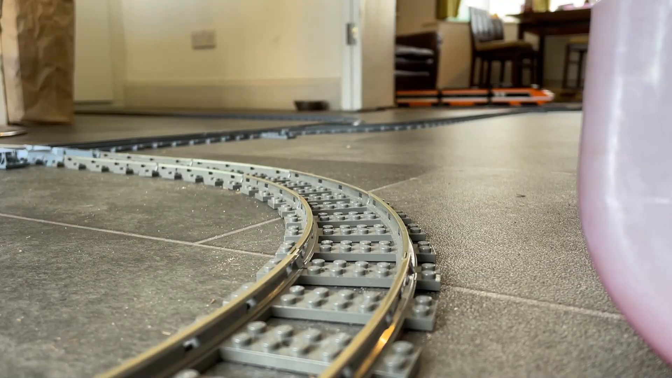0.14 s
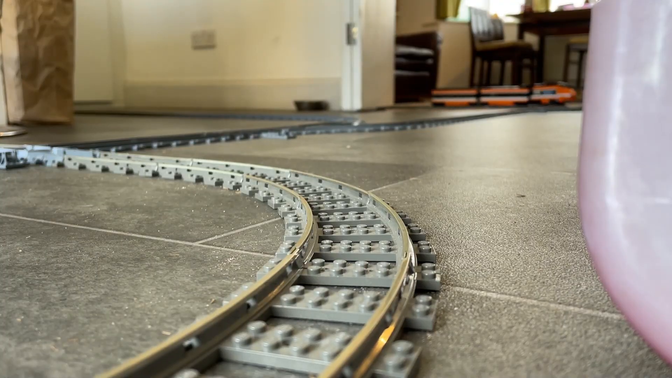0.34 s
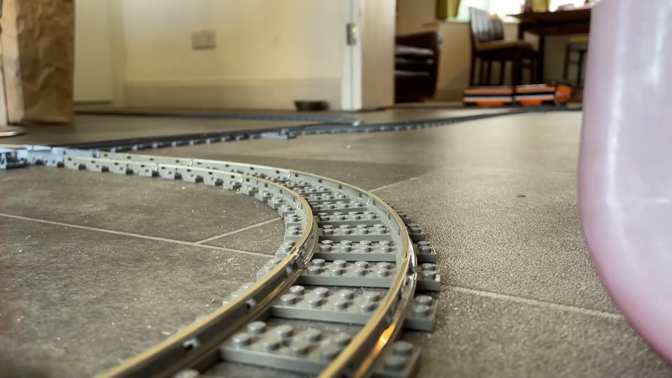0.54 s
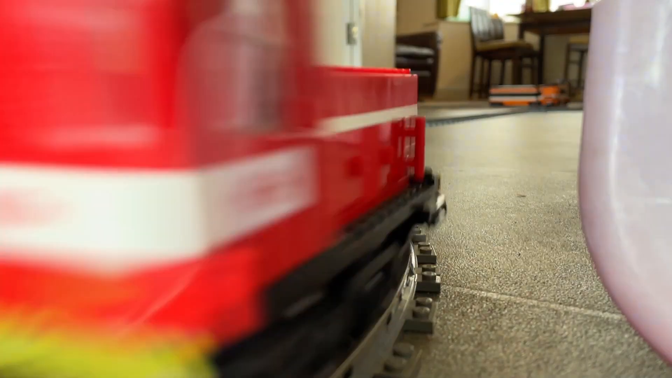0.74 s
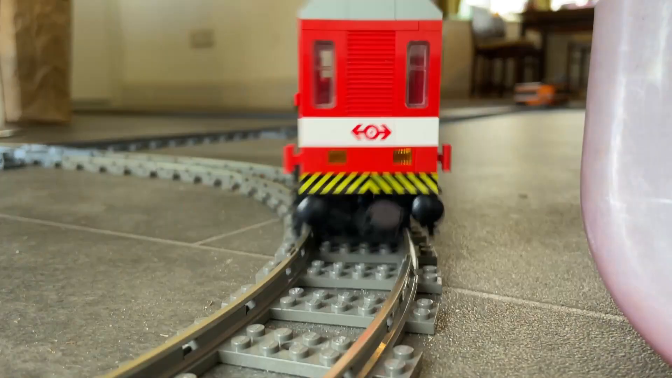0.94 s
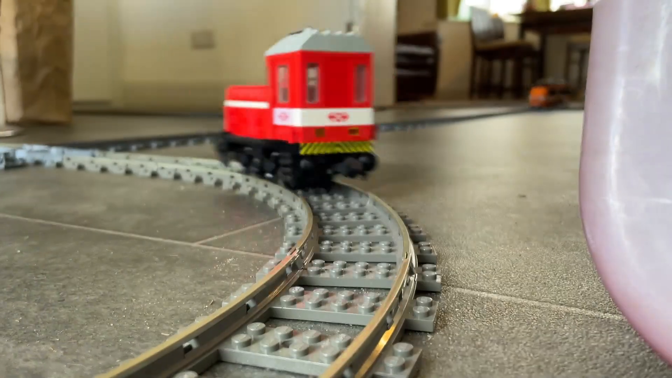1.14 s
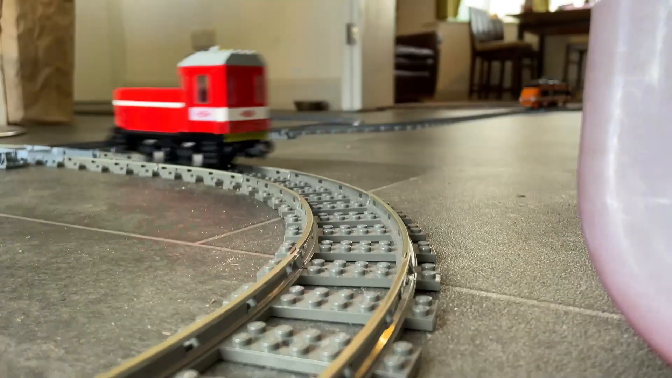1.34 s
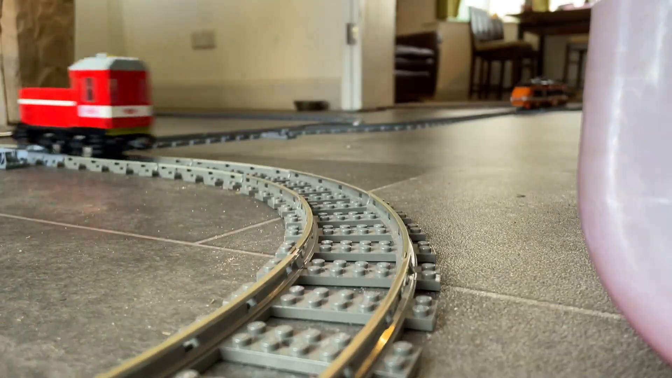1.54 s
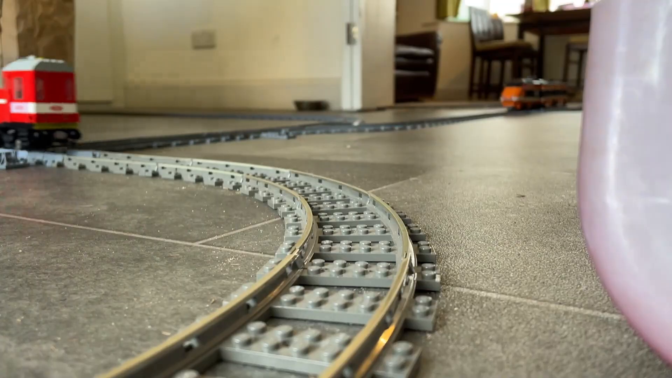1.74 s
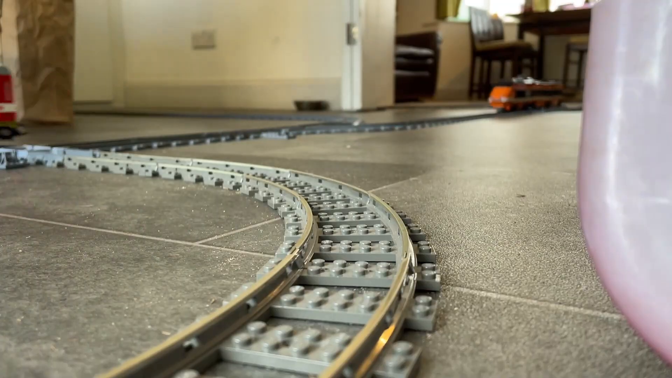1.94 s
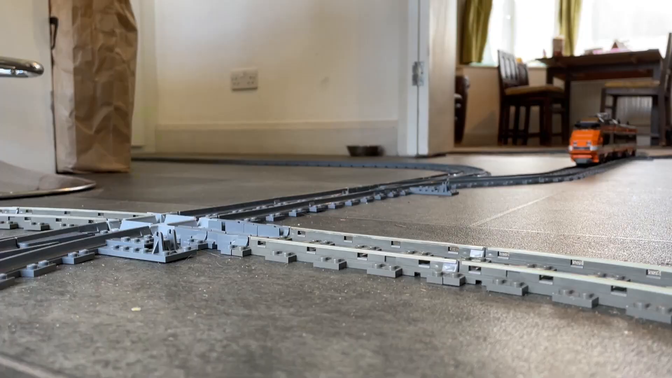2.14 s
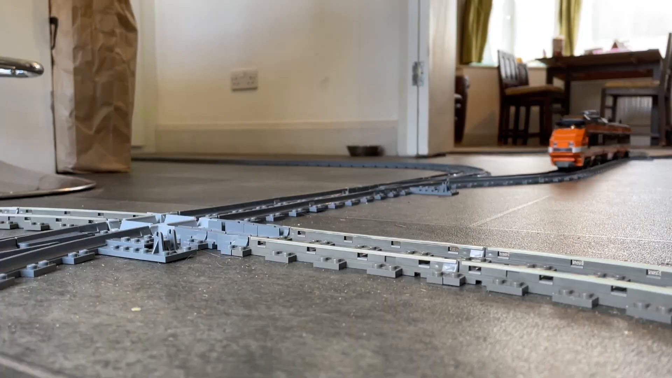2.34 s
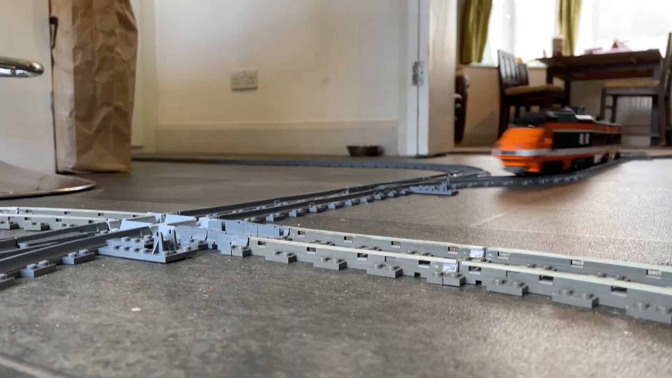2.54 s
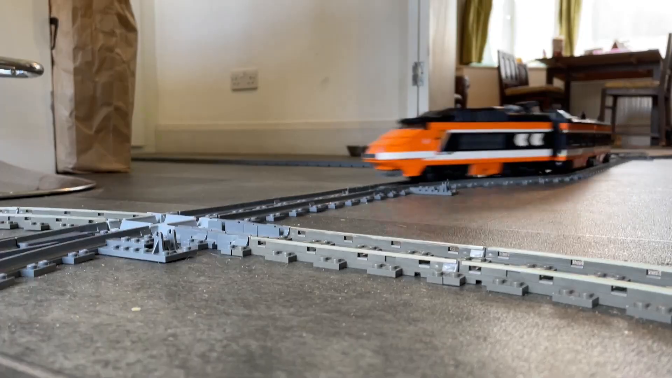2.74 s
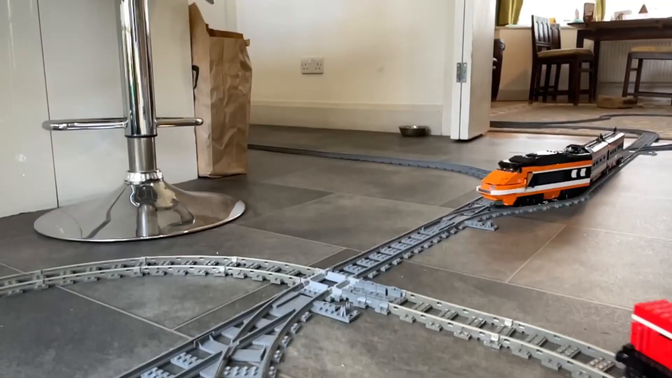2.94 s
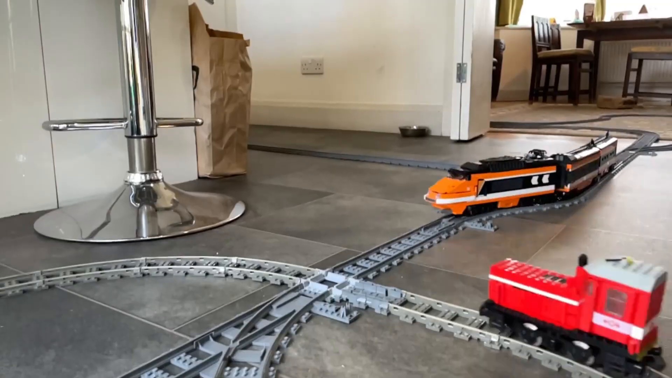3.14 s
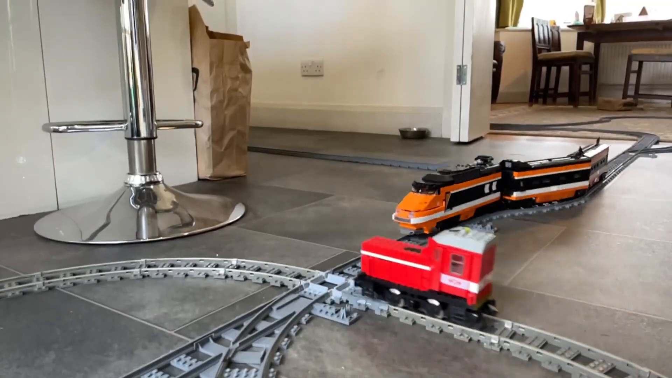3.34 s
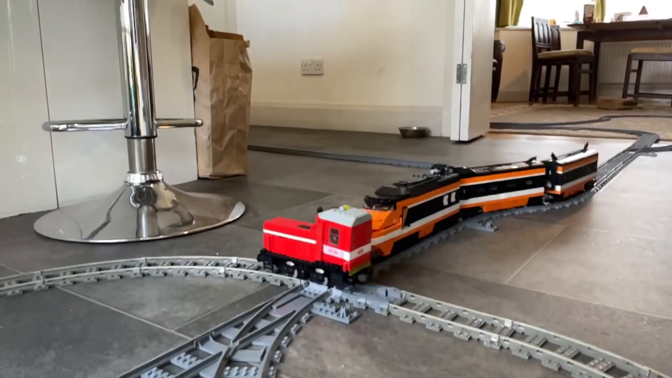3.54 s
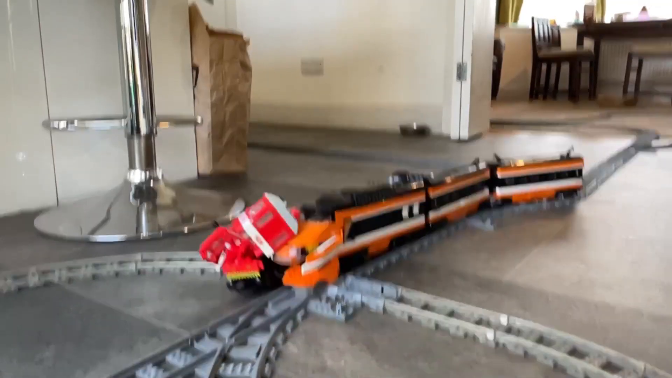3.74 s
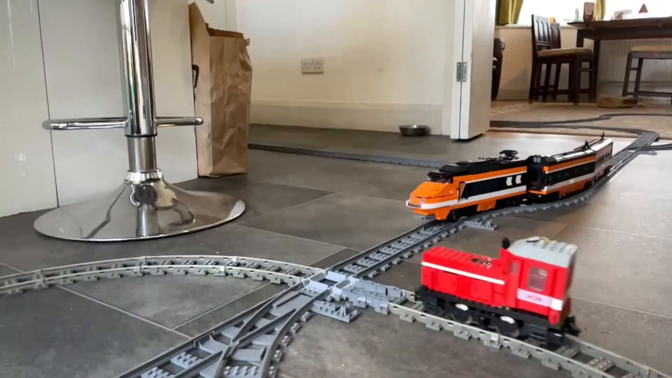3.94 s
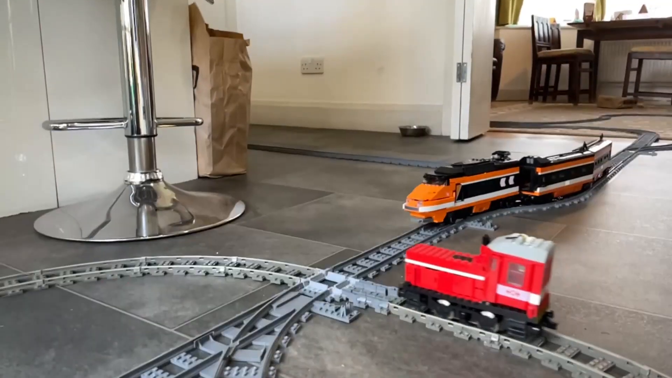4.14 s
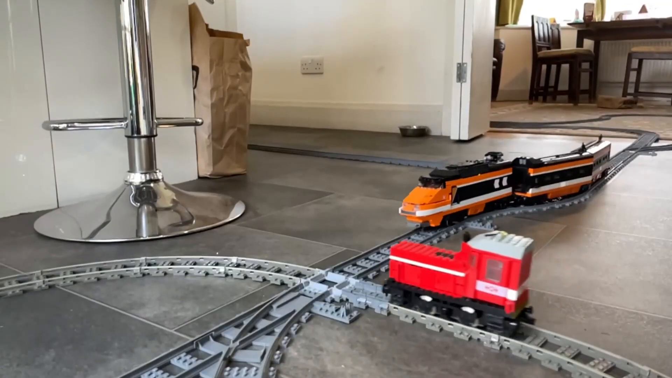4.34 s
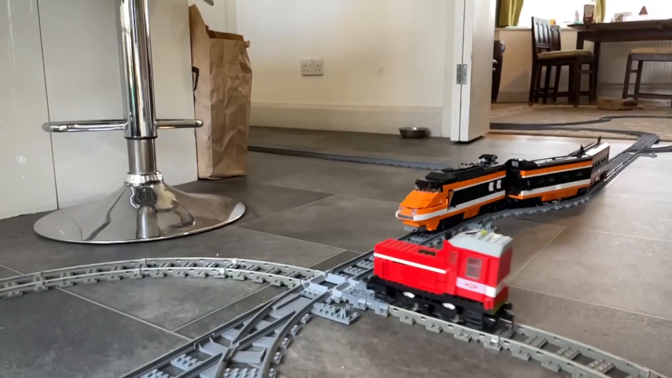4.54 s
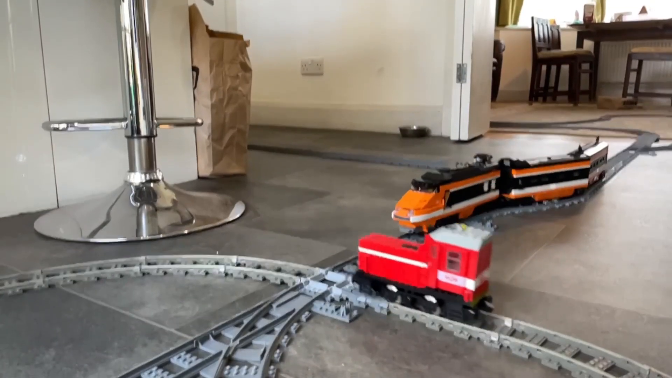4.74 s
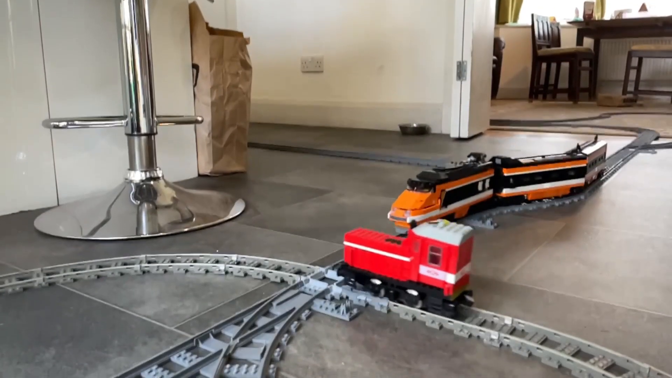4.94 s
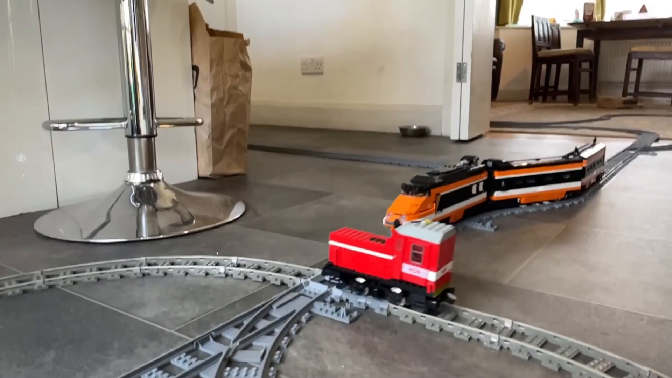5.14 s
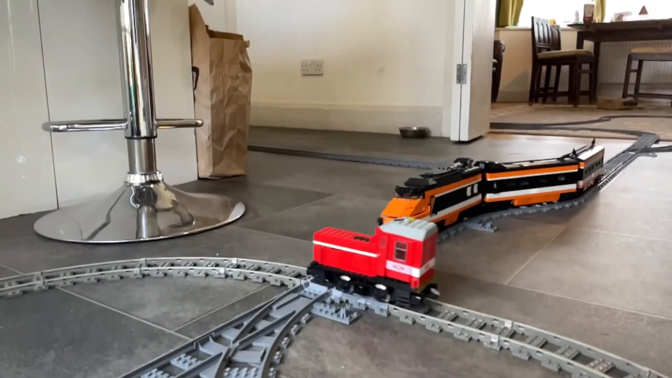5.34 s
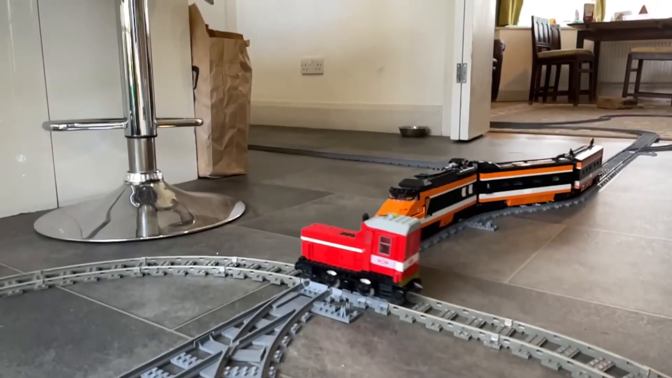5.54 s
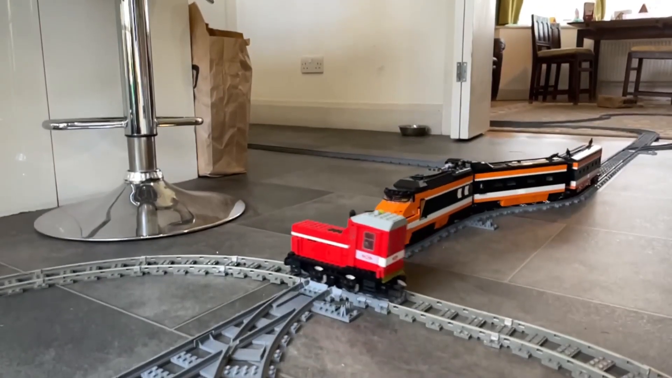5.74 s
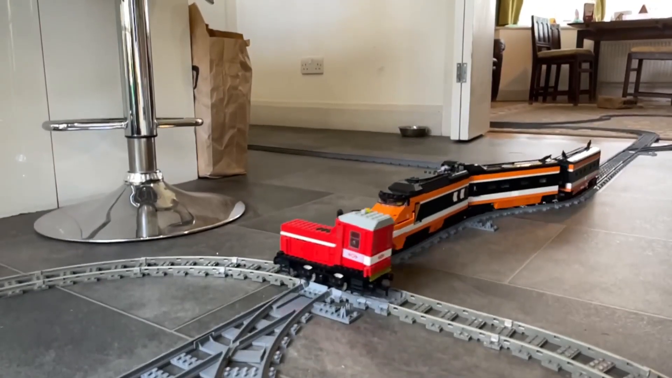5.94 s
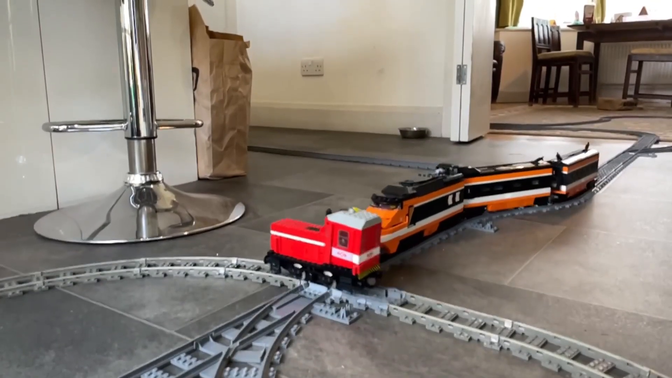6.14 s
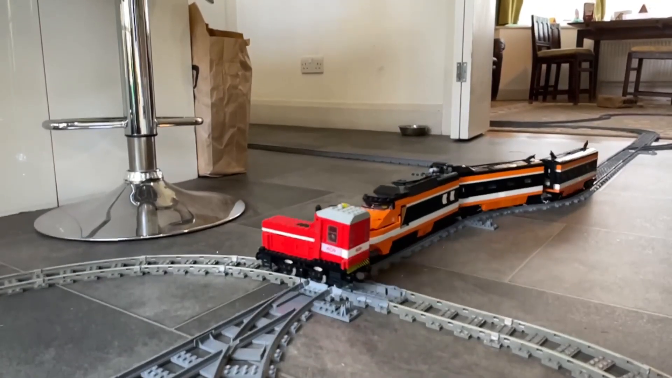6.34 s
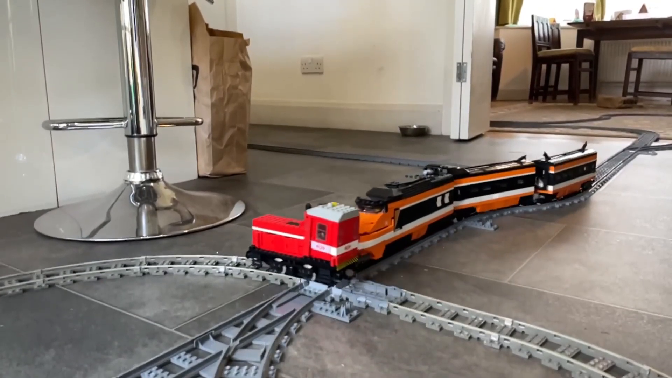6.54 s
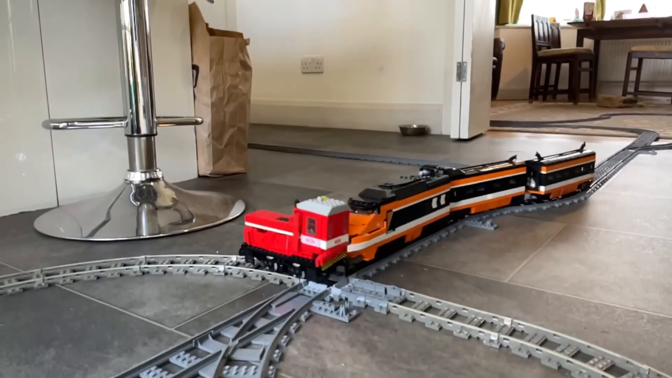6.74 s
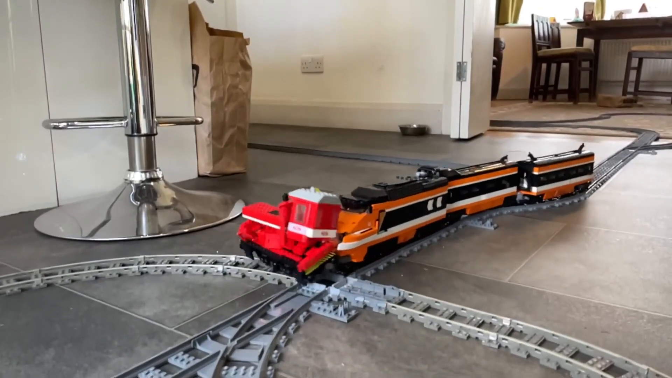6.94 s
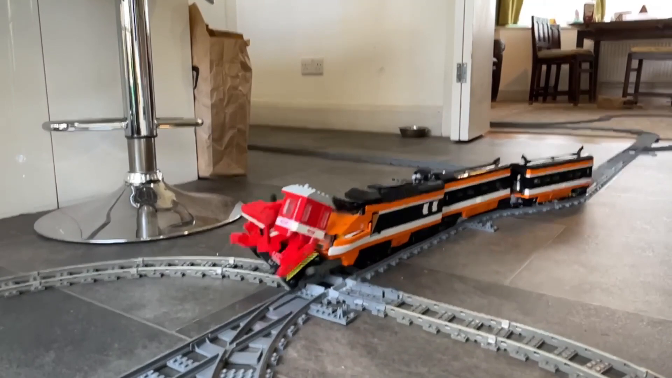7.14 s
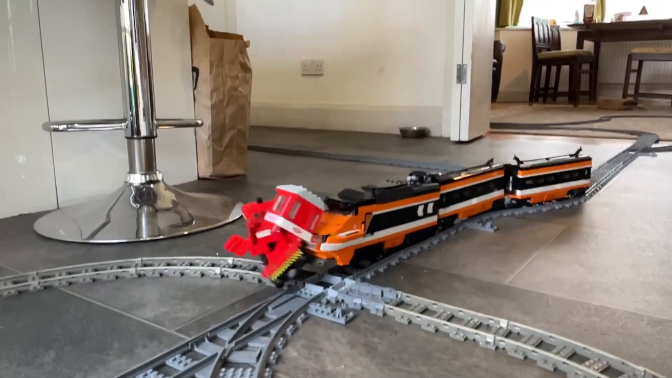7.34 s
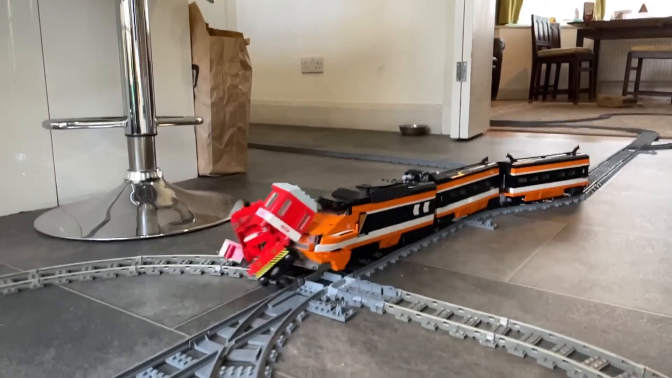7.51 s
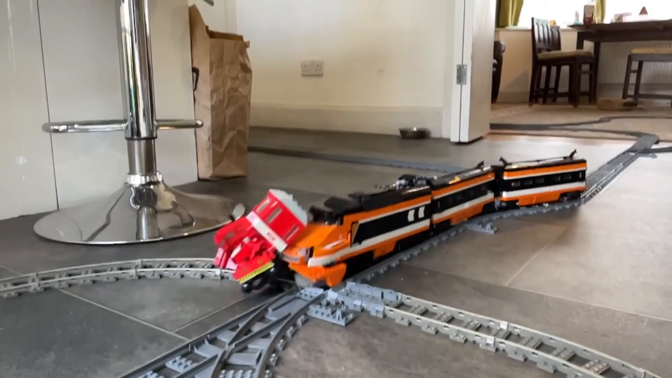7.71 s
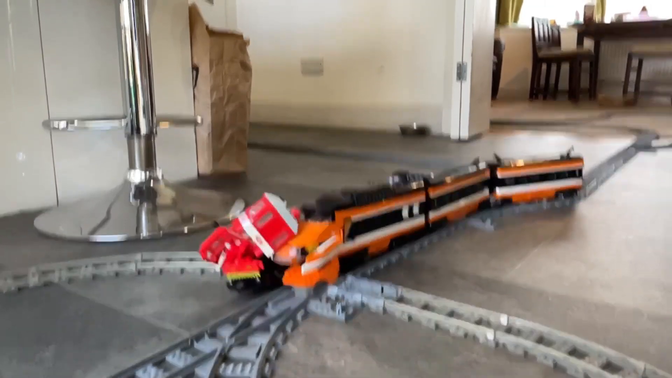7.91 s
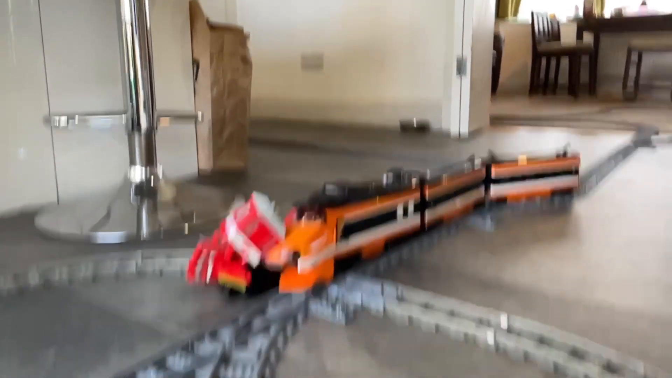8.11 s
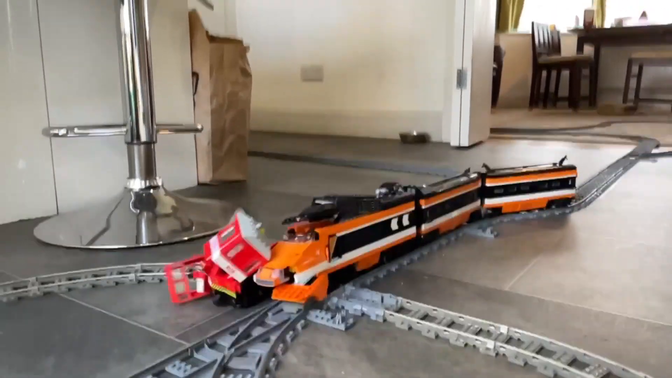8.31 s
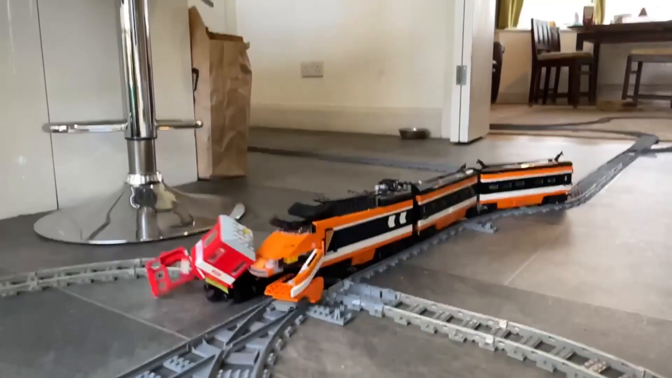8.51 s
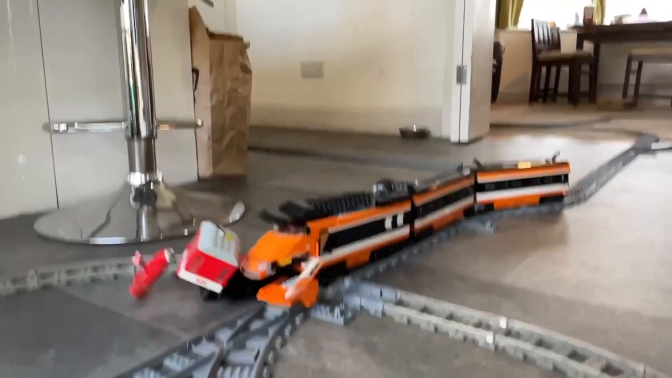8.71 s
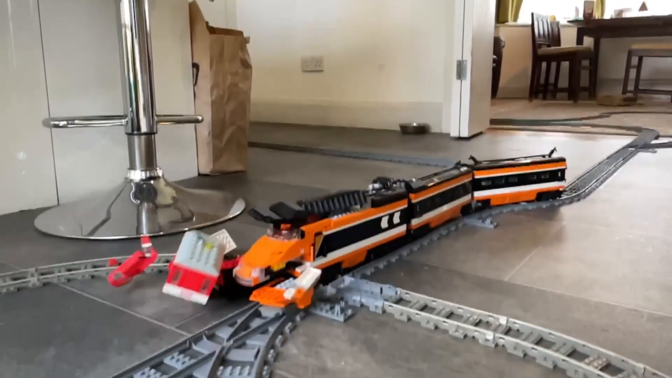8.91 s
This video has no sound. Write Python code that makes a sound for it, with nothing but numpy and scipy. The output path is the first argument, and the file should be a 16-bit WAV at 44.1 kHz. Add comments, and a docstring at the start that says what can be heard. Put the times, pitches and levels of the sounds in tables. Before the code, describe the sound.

Small motorised toy trains rattle along plastic track and collide with a brick clatter, then the crash repeats slowed down and dull.

```python
"""Motorised toy trains rattle along plastic track on a hard floor, heard from three places in turn.
Small random impacts shake their resonant bodies, gears whirr, and wheels knock on the rail joints.
At 3.6 s the trains collide and bricks clatter, each piece ringing at its own natural frequency.
From 4.4 s the event repeats in slow motion, dull, with the body modes three octaves down:
first a steady rolling, then at 6.6 s the impact and a long tumble of bricks."""
import sys
import numpy as np
from scipy import signal
from scipy.fft import rfft, irfft, next_fast_len
from scipy.io import wavfile
from scipy.ndimage import uniform_filter1d

SR = 44100
rng = np.random.default_rng(int(sys.argv[2]) if len(sys.argv) > 2 else 0)


def file_out(sig):
    """Save sig as 16-bit WAV at sys.argv[1]."""
    # one column per channel
    cols = np.atleast_2d(sig).T
    # limit, then scale
    lim = np.clip(cols, -1, 1)
    pcm = np.round(lim * 32767).astype(np.int16)
    wavfile.write(sys.argv[1], SR, pcm)


N = 399987

# Rattle envelopes for the three places, then the collision:
# (time [s], level [dB], bass control [dB], gear whirr control [dB], left minus right [dB])
FULL_SPEED_ENVELOPES = [
    [(0, -48, -2.5, -2.5, 0), (.2, -46.5, -10, -5, 0), (.44, -42, -7, -6.5, 1), (.53, -41, -9, 2.5, 3.5),
     (.56, -29, -12, -2.5, 4), (.65, -28.5, -19, -2.5, 4.5), (.74, -28, -9, 0, 2.5),
     (.79, -35.5, -14.5, 2, 6.5), (.9, -34.5, -14, -5, 6.5), (1.37, -43, -7.5, -5, 3.5),
     (1.78, -53, -7, 2.5, 2.5), (1.93, -42.5, -4, -1, 1), (2.16, -53, -6, 3, 2)],
    [(2.156, -38, -5, -9, 2.5), (2.174, -39, 4, 5, 1.0), (2.594, -31.5, -10, 1, -1.5),
     (2.69, -28, -6, -1, 1), (2.76, -27, -3.5, -4, 0.5), (2.858, -27.5, -1, -3.5, 2),
     (2.992, -29, -1.5, 2.5, 1), (3.118, -30.5, -5.5, 1.5, 3), (3.158, -31.5, 3, 5.5, 6)],
    [(3.158, -42, 0, -11.5, 2.5), (3.215, -43.5, -10.5, -11, 2.6), (3.425, -38.5, -13.5, -5, 2.9),
     (3.609, -37, -9.5, -11.5, 2.43)],
    [(3.61, -37.5, -15.5, 0, 5.1), (3.624, -30, -15, 3, 1.2), (3.714, -35.5, -12, 0.5, 2),
     (3.746, -28.5, -9.5, -3.5, 3.5), (3.78, -31, -6, -3, 3.3), (3.82, -27.5, -12, -1.5, 2.7),
     (3.87, -34.5, -7.5, 5, 2.45), (3.95, -31, -7, -5, 3.6), (4.06, -31, -5, -6, 2),
     (4.1, -29, -7.5, -12, 2.6), (4.17, -30, -8, -8.5, 2.9), (4.2, -33, -4.5, -10, 2.5),
     (4.368, -30, -11, -12, 3.4), (4.454, -45.5, -1, -7, 3.4), (4.47, -63, -19, -11, 5.0)],
]
# Rattle envelopes in slow motion, before and after the impact: (time [s], level [dB])
SLOW_ENVELOPES = [
    [(4.44, -46), (4.52, -53), (4.9, -51), (5.1, -49.5), (5.36, -49), (5.6, -48), (5.8, -52), (6.1, -48),
     (6.4, -49.5), (6.52, -52), (6.58, -52.5), (6.6, -45)],
    [(6.6, -38.5), (6.77, -37), (6.85, -43.5), (7.13, -46.5), (7.15, -41.5), (7.46, -49.5), (7.6, -45),
     (7.7, -43), (7.735, -35.5), (7.75, -29), (7.87, -36), (7.99, -38.5), (8.13, -33), (8.24, -33),
     (8.33, -32), (8.46, -39.5), (8.48, -35.5), (8.66, -44), (8.68, -38.5), (8.78, -46), (8.95, -39.5),
     (9.07, -46.5)],
]

# Spectra of the rattles and of a full-speed blow: (frequency [Hz], level [dB])
ENGINE_SPECTRUM = [(29, -30), (50, -29), (72, -1.5), (151, -1), (244, -5), (489, -6), (592, -12), (652, -8),
                   (1110, -8.5), (2330, -8.5), (8110, -15), (8920, -15.5), (15500, -34)]
LONG_TRAIN_SPECTRUM = [(29, -28), (50, -28), (72, -2), (119, -6), (367, -10), (565, -11), (1220, -11),
                       (2270, -11), (3670, -13), (7540, -12), (8920, -15.5), (10800, -23.5), (15500, -36.5)]
CRASH_SPECTRUM = [(29, -27), (50, -27), (72, 0.5), (174, -1.5), (413, -11.5), (753, -7.5), (1340, -8),
                  (2820, -6), (3260, -11.5), (3950, -5.5), (9360, -11), (10800, -17), (15500, -24)]
SLOW_SPECTRUM = [(30, -50.5), (70, -17.5), (130, -3.5), (200, -1), (500, -5), (800, -6), (1050, -7.5),
                 (1400, -14), (1850, -19), (2300, -18), (2400, -28)]
BLOW_SPECTRUM = [(300, -20.5), (1000, -4.5), (2500, -6.5), (6000, -6.5), (12000, -11), (16000, -22.5)]
# Resonances of brick bodies and motor housing: (frequency [Hz], bandwidth [Hz], lift [dB])
HOUSING_RESONANCES = [(130, 17, 5), (573, 61, 8), (1566, 180, 3.5), (2323, 250, 3), (4570, 360, 4),
                      (5370, 260, 3.5), (7580, 69.6, 10), (8970, 380, 7.5)]

# The range that each timbre control lifts: (frequency [Hz], weight [dB/dB])
BASS = [(260, 0.78), (400, 0.057)]
WHIRR = [(1600, 0.7), (2100, 0.72), (3000, 0.6), (3600, 0.25)]
HOLLOW = [(260, 0.43), (400, 0.77), (1100, 0.055), (1600, 0.067)]
FIZZ = [(5000, 0.31), (7500, 0.496)]
THUD = [(300, 0.68), (450, 0.097)]
TICK = [(900, 0.024), (1200, 0.28)]
# Change of timbre with rattle level, one row a stretch: (hollow body [dB/dB], fizz [dB/dB])
TIMBRE_SLOPES = [(-0.43, -0.4), (0.14, 0.99), (-.3, -1), (-0.29, 0.93)]
# The same in slow motion: (thud [dB/dB], tick [dB/dB])
SLOW_TIMBRE_SLOPES = [(-.3, 0.1), (-.3, -0.19)]

# Wheels meeting rail joints, and bricks striking:
# (time [s], level [dB], tilt [dB/octave], ring frequency [Hz], relative ring level [dB])
JOINT_BLOWS = [(0.157, -35, 3, 2830, -3), (0.311, -42, 6, 9000, -6), (0.327, -22, 4.5, 2660, 2),
               (0.3915, -25.5, 2, 3030, -1), (0.476, -29, 3.5, 2100, 0), (0.4954, -16.5, 1, 2600, 5.5),
               (0.541, -31, 2, 4740, -2), (0.558, -25, 4, 2380, 11), (0.634, -23, 4, 4300, 8),
               (0.659, -24, -3, 600, 6), (0.676, -17.5, 0, 604, 13), (0.707, -20, 0, 3500, 1),
               (0.722, -17, -4, 580, 9), (0.75, -18, -4, 610, 7), (0.895, -20.5, -5, 1400, -1),
               (0.936, -22, -9, 277, 10), (0.994, -25.5, -5, 3960, 4), (1.075, -30, -4, 2200, 2),
               (1.167, -36, 0, 2980, 8), (1.306, -25, -10, 2300, -5.5), (1.4184, -30.5, -2, 2620, 2),
               (1.593, -27, 0, 2520, 1), (1.6471, -22.5, -4.5, 1590, 8), (1.6555, -25.5, 0.5, 4630, -2),
               (1.6985, -33, -7, 2380, 7), (1.708, -34, -8, 4440, 2), (1.7424, -32, -1, 4470, -13),
               (1.8134, -26.5, 0, 2940, 0), (1.847, -22.5, -0.5, 2200, 3), (1.907, -24.5, -4, 2320, 11),
               (1.992, -28, -2.5, 2300, 1), (2.814, -13, 3, 4365, -6), (2.871, -21, -2.5, 2793, -0.5),
               (2.928, -12, -6, 563, -9), (2.94, -14, -8.5, 586, 2), (3.324, -27, 5, 2500, -6),
               (3.429, -27, -1.5, 1490, 12), (4.648, -55.5, -9, 686, 1), (4.891, -38.5, -2, 2050, -2),
               (5.13, -43, 1.5, 2270, -1.5), (5.219, -49, 5, 2140, -3), (5.35, -33.5, 2.5, 1374, -8),
               (5.545, -41, 10, 2210, 2), (5.658, -34.5, 2.5, 2233, -2), (5.889, -37.5, -2, 1500, -7),
               (6.089, -31, 6.5, 2320, -9), (6.494, -39, -4, 1413, -1)]
BRICK_BLOWS = [(3.611, -13, 2, 1947, -12), (3.624, -11.5, -4, 1770, -0.5), (3.68, -20, -1.5, 2140, 0),
               (3.75, -11.5, -1.5, 4304, -7.5), (3.803, -15.5, -3.5, 5990, 1.5),
               (3.813, -11, -1, 3870, 0.5), (3.8985, -21, -0.5, 5360, 4), (3.934, -15.5, -5, 840, 2.5),
               (3.951, -19.5, -8.5, 200, 9.5), (3.985, -13.5, -5, 900, -3), (4.021, -12.5, 1.5, 3997, 12),
               (4.022, -17, -5.5, 800, 2.5), (4.082, -22, -10.5, 210, 8.5), (4.093, -17, 5.5, 5620, 10),
               (4.108, -19, 3, 5270, 8), (4.134, -17, 1.5, 5280, 10), (4.154, -14, -7, 847, 4),
               (4.236, -21, 3, 5360, 0), (4.371, -17, 2, 5410, 4), (6.605, -15, 6, 1356, -4.5),
               (6.62, -25.5, 4, 258, 2), (6.659, -27, -1, 352, -2), (6.752, -22.5, -0.5, 334, 11.5),
               (6.782, -27, -1, 400, 3.5), (6.898, -33, 3, 2350, 4), (6.98, -34, -3, 1585, 0),
               (7.088, -41, 9, 1300, -3), (7.146, -29, 1.5, 338, -1), (7.19, -32.5, -6, 293, 4.5),
               (7.241, -35, 3, 453, 4), (7.312, -29, 6, 497, 3), (7.431, -34.5, 0, 2120, 4),
               (7.571, -25.5, 3.5, 748, -2.5), (7.59, -35.5, 5, 2160, -3), (7.745, -16.5, 3, 474, 5.5),
               (7.775, -22.5, -0.5, 688, 0.5), (7.803, -26, -4.5, 302, 5.5), (7.835, -20, 3, 2248, -8),
               (7.855, -26, 1.5, 341, 7), (7.931, -26.5, 1, 1360, -4), (8.029, -27, 7, 1309, -2),
               (8.054, -32, 4, 2200, 5.5), (8.075, -24.5, -3.5, 237, 4.5), (8.105, -22.5, 3, 1430, -4),
               (8.1426, -17, 6.5, 2254, 4), (8.147, -22.5, 1.5, 1336, 7), (8.1745, -16.5, 2.5, 746, 3.5),
               (8.194, -15.5, 3.5, 1535, 3.5), (8.22, -22.5, 1.5, 760, 2), (8.254, -20.5, -4.5, 484, 9),
               (8.2815, -23, -1.5, 1397, 2), (8.3496, -26.5, 1.5, 1520, 0), (8.4, -27, 4.5, 1430, 3),
               (8.48, -25, 6, 2295, 5), (8.509, -36, 5.5, 700, -2), (8.671, -25, -3.5, 235, 3),
               (8.851, -33, 2.5, 1360, -6), (8.969, -31.5, -5, 570, 12)]
# Train body modes, excited by every blow: (frequency at full speed [Hz], relative level [dB])
BODY_MODES = [(290, 5), (565, -4), (2400, -8), (2750, -5), (4500, -15.5), (5350, -9.5), (10400, -5.5),
              (18100, 3)]
# Brief swells of gear whirr, wheel rasp, scraping, a shaken hollow body or a floor thump:
# (time [s], duration [s], frequency [Hz], bandwidth [Hz], level [dB])
SWELL_EVENTS = [(0.26, 0.7, 2560, 960, -42), (.53, 0.14, 4600, 500, -38), (.54, 0.32, 575, 69, -38.5),
                (0.878, 0.06, 1100, 900, -37), (.92, 0.047, 298, 150, -40), (1.9, 0.26, 154, 80, -36),
                (2.177, 0.029, 2760, 1200, -37.5), (2.75, 0.36, 150, 80, -36), (3.72, 0.19, 176, 63, -35.5),
                (4.105, 0.078, 2850, 99.5, -33.5), (2.47, 0.061, 580, 98, -36.5),
                (2.7, 0.11, 590, 100, -38.5), (2.931, 0.058, 584, 90, -31), (2.7, 0.072, 586, 99.7, -38.5),
                (0.748, 0.61, 2210, 120, -50), (.75, 0.56, 2950, 210, -47), (0.796, 0.59, 5100, 150, -47.5),
                (.87, 0.49, 1570, 220, -46.5), (0.547, .3, 3600, 120, -48), (0.69, 0.097, 3140, 900, -34.5),
                (0.6, 0.12, 2420, 250, -37), (2.7, 0.24, 2300, 300, -40.5), (2.919, .04, 4200, 1500, -27.5),
                (3.988, 0.045, 720, 298, -27.5), (4.16, 0.044, 726, 290, -26),
                (6.599, 0.32, 227, 150, -41.5), (7.732, 0.16, 380, 440, -37), (8.4, 0.05, 400, 300, -43),
                (8.212, 0.06, 790, 200, -30.5), (8.222, 0.054, 489, 91, -32.5), (8.29, 0.06, 310, 240, -35),
                (8.05, 0.5, 110, 56, -43.5), (6.6, 0.36, 100, 48, -46.5)]

# Relation between the two channels:
# (frequency [Hz], coherence [0-1], phase lead of the right [rad], left minus right [dB])
RUNNING_STEREO = [(60, .85, 0, -3), (170, .85, -.2, -2), (780, .5, -.2, 1), (1380, .4, 2.2, 0.5),
                  (1980, .5, .7, .1), (2580, .65, -.3, .1), (3400, .55, -.4, 2), (5000, .6, -.4, 1.5),
                  (7200, .55, .4, -1), (10000, .2, -.5, -3), (14000, .4, .1, -3)]
CRASH_STEREO = [(60, .85, 0, -3), (220, .82, 0, 0), (450, .33, .1, -1.5), (900, .4, -1.3, 2),
                (1350, .33, -2.5, .5), (2200, .3, -.4, -1.5), (3400, .1, -2.5, .1), (5000, .3, -2, 1),
                (7200, .3, .4, 1.5), (10000, .2, -.4, -3), (14000, .4, .1, -3)]
SLOW_STEREO = [(50, .3, 0, 3), (400, .2, .1, 3), (850, .5, -.8, 6), (1100, .85, -.4, 1),
               (1400, .98, .01, .5), (1740, 1, 0, 0), (1790, 1, .43, 0), (1920, 1, -.47, 0),
               (1970, 1, 0, 0), (2400, .98, .01, .5)]


def gain_of(db):
    """Amplitude ratio: tenfold for every 20 dB."""
    return 10 ** (np.asarray(db) / 20)


def unit_rms(x):
    """Normalisation to unit mean power."""
    return x / np.sqrt(np.mean(x ** 2) + 1e-20)


def curve_at(points, hz):
    """Linear interpolation on a logarithmic frequency axis."""
    f, value = np.transpose(points)
    return np.interp(np.log(hz + 1), np.log(f + 1), value)


def add(mix, start_s, sound):
    """Superposition: a stereo sound adds to the mix from start_s on."""
    part = mix[:, round(start_s * SR):][:, :sound.shape[1]]
    part += sound[:, :part.shape[1]]


def jolts(size, per_s, spread_db, t60, depth):
    """Shot noise: small random impacts, a few of them large, decay and modulate white noise."""
    strengths = gain_of(spread_db * np.minimum(rng.exponential(1, size), 4))
    hits = strengths * (rng.random(size) < per_s / SR)
    shake = signal.lfilter([1], [1, -gain_of(-60 / (t60 * SR))], hits)
    return (1 + depth * shake / shake.mean()) * rng.standard_normal((2, size))


def rattle(times, level_db, spectrum, resonances, controls, band_hz, shaking, patchy_db, ringing_db):
    """Source and filter: jolts pass through the train's changing response, levelled within band_hz."""
    fade_s = 0.004
    drive = jolts(round((times[-1] - times[0] + fade_s) * SR), **shaking)
    hz, frame_s, frames = signal.stft(drive, SR, nperseg=1024, noverlap=768)
    lift_db = sum(db / (1 + (2 * (hz - f) / width) ** 2) for f, width, db in resonances)
    steady_db = (curve_at(spectrum, hz) + lift_db)[:, None]
    response_db = steady_db
    for weights, control_db in controls:
        change_db = np.interp(times[0] + frame_s, times, control_db - np.median(control_db))
        response_db = response_db + curve_at(weights, hz)[:, None] * change_db
    # Loose bricks come and go in broad patches; single parts ring on in narrow bands.
    wide, thin = rng.standard_normal(response_db.T.shape + (2,)).T
    for depth_db, noise, bins, span in (patchy_db, wide, 9, 8), (ringing_db, thin, 2, 14):
        across_bins = uniform_filter1d(noise, bins, axis=0)
        response_db += depth_db * unit_rms(uniform_filter1d(across_bins, span, axis=1))
    _, shaped = signal.istft(frames * gain_of(response_db), SR, nperseg=1024, noverlap=768)
    in_band = (hz > band_hz[0]) & (hz < band_hz[1])
    power = abs(frames) ** 2
    band_rms = drive.std() * np.sqrt(np.sum((power * gain_of(2 * steady_db))[:, in_band]) / power.sum())
    t = times[0] + np.arange(drive.shape[1]) / SR
    fade = np.sqrt(signal.windows.tukey(len(t), 2 * fade_s * SR / len(t)))
    return shaped[:, :len(t)] / band_rms * gain_of(np.interp(t, times, level_db)) * fade


def mode_pair(hz, t):
    """Beating: two modes close in frequency interfere."""
    lower = np.sin(2 * np.pi * (hz * t + rng.random()))
    upper = np.sin(2 * np.pi * (hz * rng.uniform(1.03, 1.15) * t + rng.random()))
    return lower + 0.29 * upper


def knock(db, tilt_db, ring_hz, ring_db, t60, spectrum, slowing, damping_power, tick_s, tick_gain):
    """Impact excitation: a burst of noise, then damped free vibration of bodies and struck piece."""
    def response(hz):
        """Spectral tilt sets the brightness of the blow."""
        return gain_of(curve_at(spectrum, hz) + tilt_db * np.log2((hz + 300) / 1000))

    t = np.arange(SR // 7) / SR
    noise = rng.standard_normal((2, len(t)))
    crack = unit_rms(irfft(rfft(noise) * response(np.fft.rfftfreq(len(t), 1 / SR)), len(t)))
    crack *= (1 + tick_gain * np.exp(-t / tick_s)) * gain_of(-11 * t / t60)  # dies before the modes
    body = np.zeros(len(t))
    for hz, mode_db in BODY_MODES:
        detune = 1 + 0.028 * rng.uniform(-1.6, 1)  # no two blows meet a body at quite the same pitch
        body += gain_of(mode_db) * response(hz / slowing) * mode_pair(hz / slowing * detune, t)
    decay_db = -60 * t / t60
    piece_decay_db = decay_db * (ring_hz / 1000) ** damping_power  # low pieces ring longer
    piece = gain_of(ring_db + piece_decay_db) * mode_pair(ring_hz, t)
    leftward = [[1], [0.5]]
    blow = gain_of(decay_db) * (crack + body * leftward) + piece * leftward
    rise_s = 0.0003 * slowing
    blow *= np.minimum(t / rise_s, 1)
    # The blow chatters: three bounces, each weaker than the last.
    bounce_s = np.array([0.0012, 0.003, 0.005]) * rng.uniform(0.6, 1.4, size=3) * np.sqrt(slowing)
    blow += sum(gain_of(-4.5 * (k + 1.5)) * np.pad(blow, ((0, 0), (delay, 0)))[:, :len(t)]
                for k, delay in enumerate((bounce_s * SR).astype(int)))
    return gain_of(db) * blow / abs(blow[0]).max()


def swell(length_s, hz, width_hz, db):
    """Forced resonance: noise drives one mode, with a quick rise, a hold and a slower fall."""
    size = next_fast_len(round(length_s * SR) + 1)
    noise = rng.standard_normal((2, SR))[:, :size]
    f = np.fft.rfftfreq(size, 1 / SR)
    band = unit_rms(irfft(rfft(noise) / (1 + (2 * (f - hz) / width_hz) ** 2), size))
    progress = np.arange(size) / SR / length_s
    ramp = np.clip(np.minimum(progress / 0.15, (1 - progress) / 0.6), 0, 1)
    return gain_of(db) * band * np.sin(np.pi / 2 * ramp) ** 2


def with_transients(rolling, times, joint_t60, brick_t60, **contact):
    """Superposition: the knocks and swells that begin within a stretch add to its rattle."""
    mix = np.zeros((2, N))
    add(mix, times[0], rolling)
    for blows, t60 in (JOINT_BLOWS, joint_t60), (BRICK_BLOWS, brick_t60):
        for at, *blow in blows:
            if times[0] <= at < times[-1]:
                add(mix, at, knock(*blow, t60, **contact))
    for at, *shape in SWELL_EVENTS:
        if times[0] <= at < times[-1]:
            add(mix, at, swell(*shape))
    return mix


def panned(db):
    """Level difference as a cue to direction: left and right gains, db apart."""
    return gain_of(np.multiply.outer([0.5, -0.5], db))


def stereo_field(arrivals, relation, right_lead_s=0):
    """Partial coherence: the left channel takes one arrival, the right a phase-shifted blend of two."""
    size = next_fast_len(N)
    hz = np.fft.rfftfreq(size, 1 / SR)
    left, other = rfft(arrivals, size)
    coherence, phase, balance_db = (curve_at(np.array(relation)[:, [0, k]], hz) for k in (1, 2, 3))
    coherence = np.clip(coherence, 0, 1)
    phase += 2 * np.pi * (hz - 1400) * right_lead_s  # the lead adds no phase at 1400 Hz
    right = coherence * left * np.exp(1j * phase) - 1j * np.sqrt(1 - coherence ** 2) * other
    return irfft(np.array([left, right]) * panned(balance_db), size)[:, :N]


def full_speed():
    """Structure-borne sound: trains run and collide, moving sideways by level difference."""
    spectra = ENGINE_SPECTRUM, LONG_TRAIN_SPECTRUM, CRASH_SPECTRUM, CRASH_SPECTRUM
    housings = HOUSING_RESONANCES, HOUSING_RESONANCES, [], []
    relations = RUNNING_STEREO, RUNNING_STEREO, CRASH_STEREO, CRASH_STEREO
    stretches = zip(FULL_SPEED_ENVELOPES, TIMBRE_SLOPES, spectra, housings, relations)
    mix = np.zeros((2, N))
    for envelope, (hollow, fizz), spectrum, resonances, relation in stretches:
        times, level_db, bass_db, whirr_db, pan_db = np.transpose(envelope)
        controls = (BASS, bass_db), (WHIRR, whirr_db), (HOLLOW, hollow * level_db), (FIZZ, fizz * level_db)
        rolling = rattle(times, level_db, spectrum, resonances, controls, band_hz=(1500, 6000),
                         shaking=dict(per_s=320, spread_db=3, t60=0.04, depth=0.38),
                         patchy_db=1.6, ringing_db=2)
        sound = with_transients(rolling, times, joint_t60=0.037, brick_t60=0.1, spectrum=BLOW_SPECTRUM,
                                slowing=1, damping_power=0.12, tick_s=0.002, tick_gain=0.83)
        mix += stereo_field(sound, relation) * panned(np.interp(np.arange(N) / SR, times, pan_db))
    return mix


def slow_motion():
    """Time scaling: the collision drawn out, with lower body modes and a lower band limit."""
    patchiness_db = 0.8, 1.4  # steady rolling, then patchy tumbling
    mix = np.zeros((2, N))
    for envelope, (thud, tick), patchy_db in zip(SLOW_ENVELOPES, SLOW_TIMBRE_SLOPES, patchiness_db):
        times, level_db = np.transpose(envelope)
        controls = (THUD, thud * level_db), (TICK, tick * level_db)
        rolling = rattle(times, level_db, SLOW_SPECTRUM, [], controls, band_hz=(100, 2450),
                         shaking=dict(per_s=84, spread_db=4, t60=0.066, depth=0.11),
                         patchy_db=patchy_db, ringing_db=2.5)
        sound = with_transients(rolling, times, joint_t60=0.09, brick_t60=0.067, spectrum=SLOW_SPECTRUM,
                                slowing=8, damping_power=0.56, tick_s=0.0088, tick_gain=1.7)
        mix += stereo_field(sound, SLOW_STEREO, right_lead_s=0.001106)
    thin = signal.sosfilt(signal.butter(2, 86, "high", fs=SR, output="sos"), mix)
    low_pass = signal.firwin(2001, 2427, window=("kaiser", 7), fs=SR)
    dull = signal.oaconvolve(thin, low_pass[None], "same")
    # Nonlinear distortion puts a faint crackle above the dull range on the loudest peaks.
    high_pass = signal.firwin(1001, 2570, pass_zero=False, fs=SR)
    crackle = signal.oaconvolve(dull * abs(dull), high_pass[None], "same")
    return dull + 0.52 * crackle


def scene():
    """Superposition of the full-speed run and the slow repeat that follows it."""
    return full_speed() + slow_motion()


def record(dry):
    """Band-pass response: the microphone drops deep bass, adds faint hiss and limits the treble."""
    thin = signal.sosfilt(signal.butter(2, 86, "high", fs=SR, output="sos"), dry)
    hiss = gain_of(-101) * rng.standard_normal(dry.shape)
    low_pass = signal.firwin(511, 15900, window=("kaiser", 9), fs=SR)
    return signal.oaconvolve(thin + hiss, low_pass[None], "same")


dry = scene()
out = record(dry)
file_out(out)
```